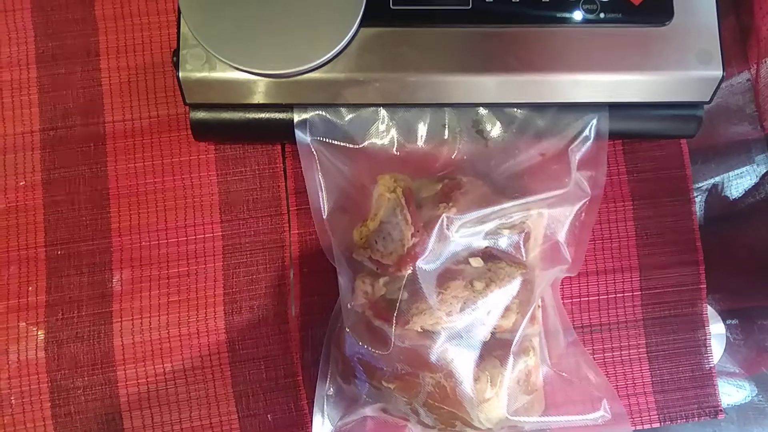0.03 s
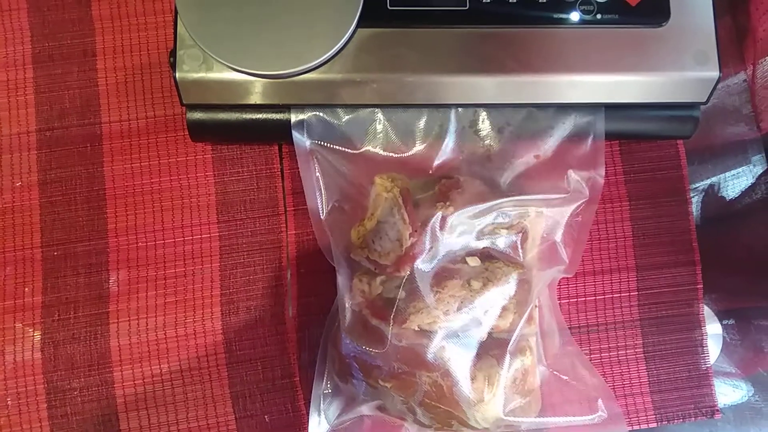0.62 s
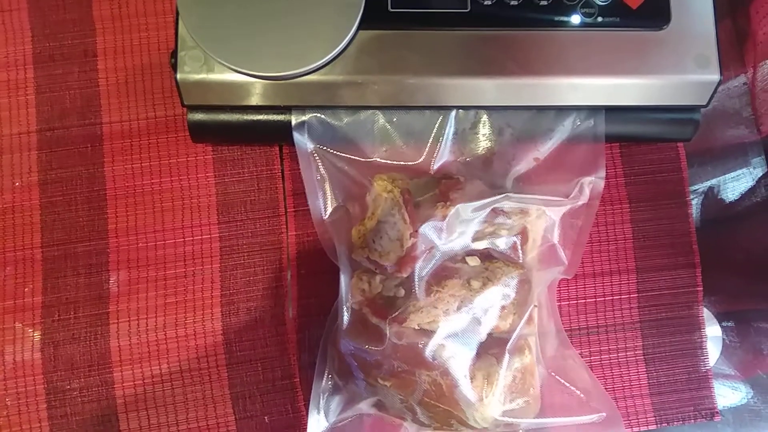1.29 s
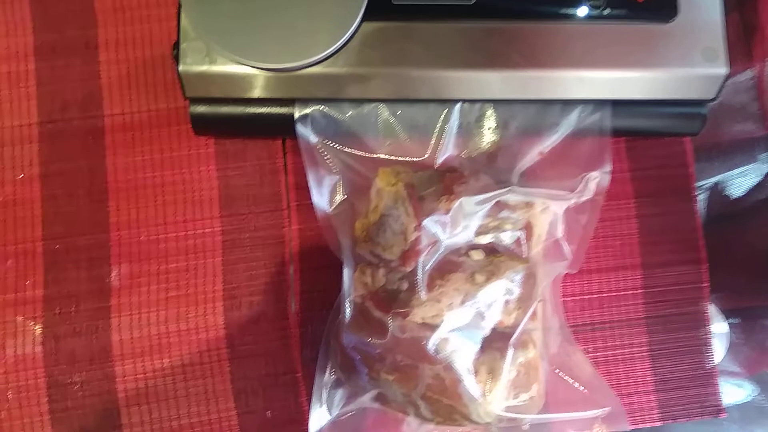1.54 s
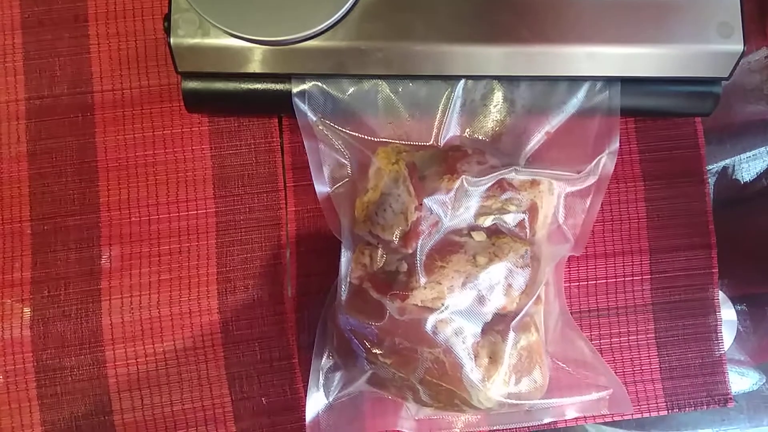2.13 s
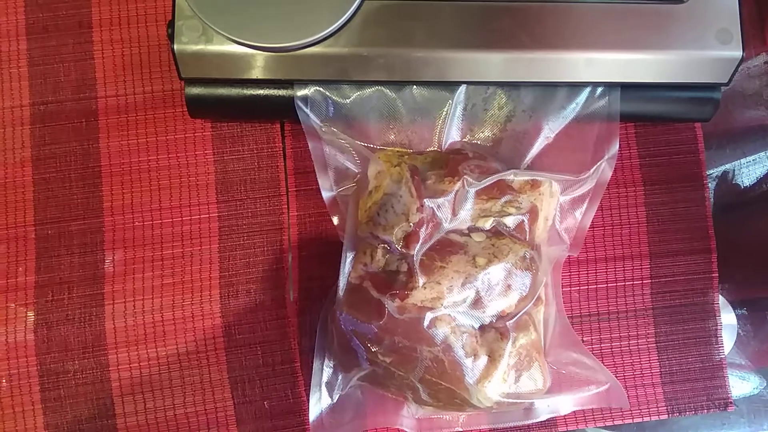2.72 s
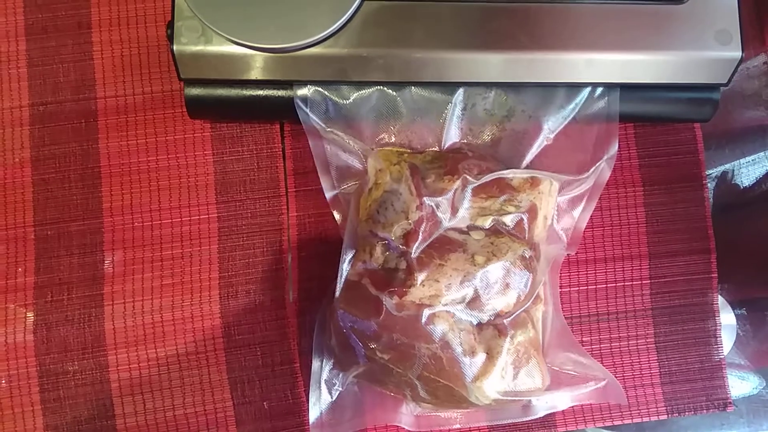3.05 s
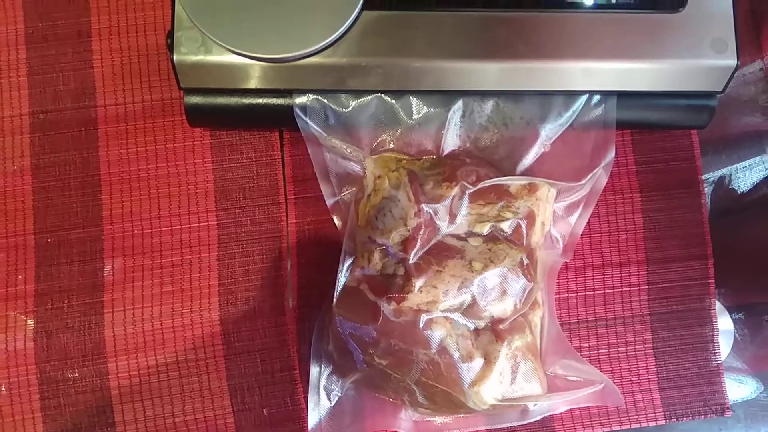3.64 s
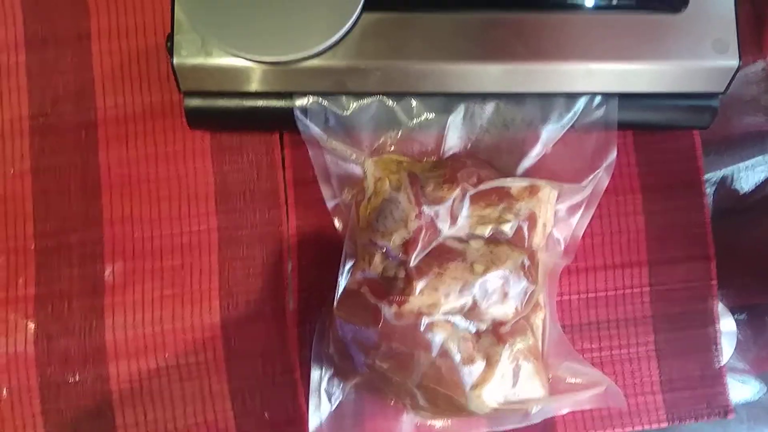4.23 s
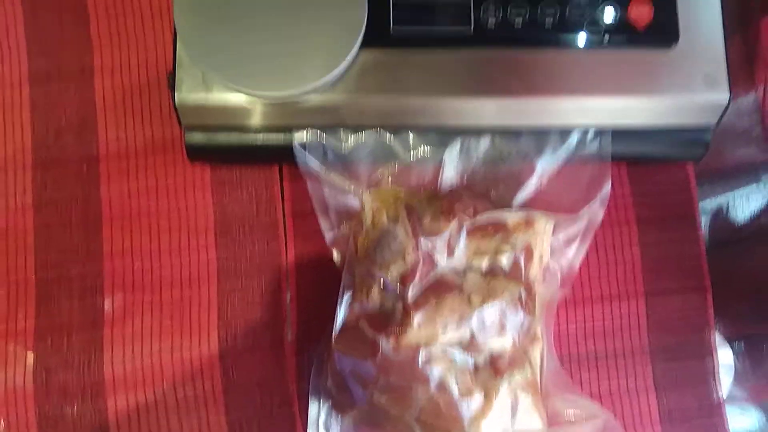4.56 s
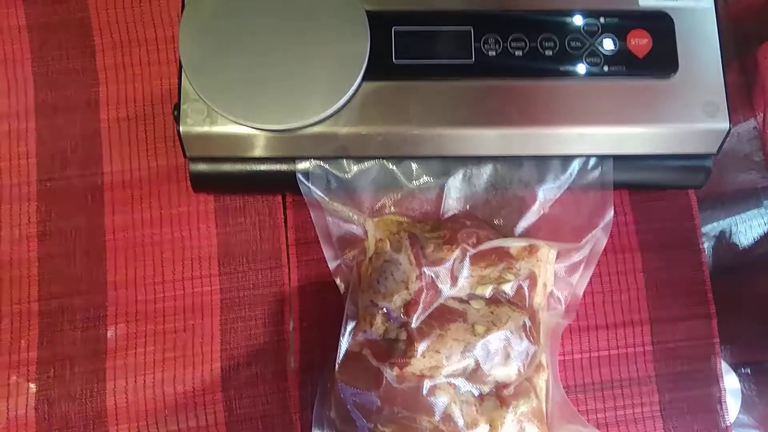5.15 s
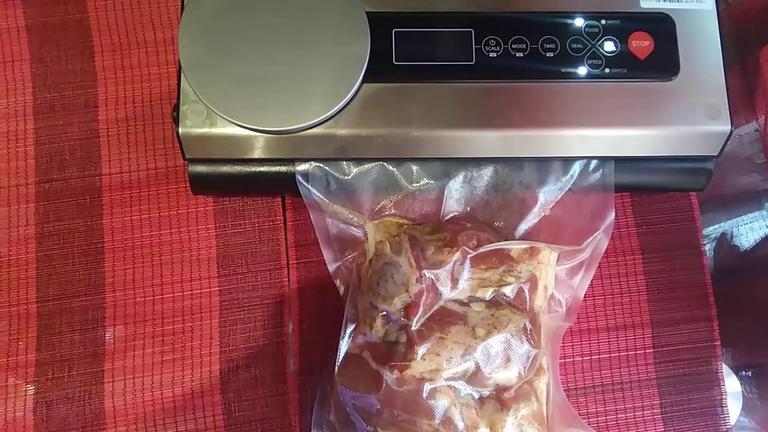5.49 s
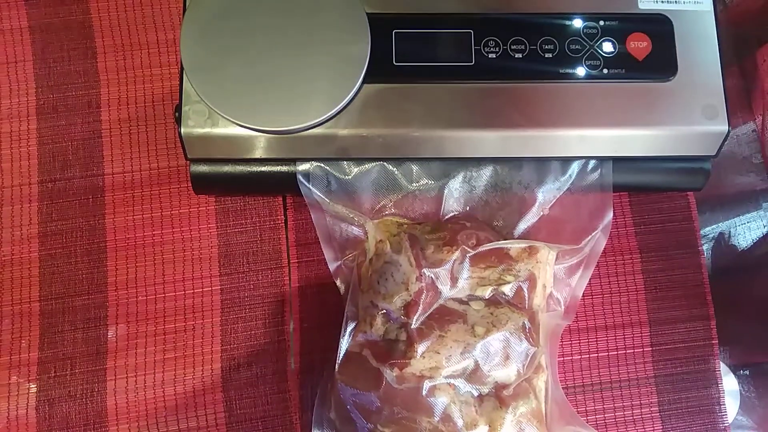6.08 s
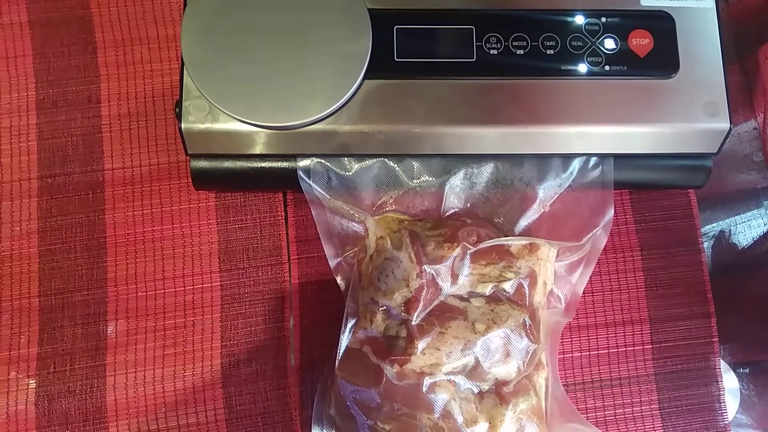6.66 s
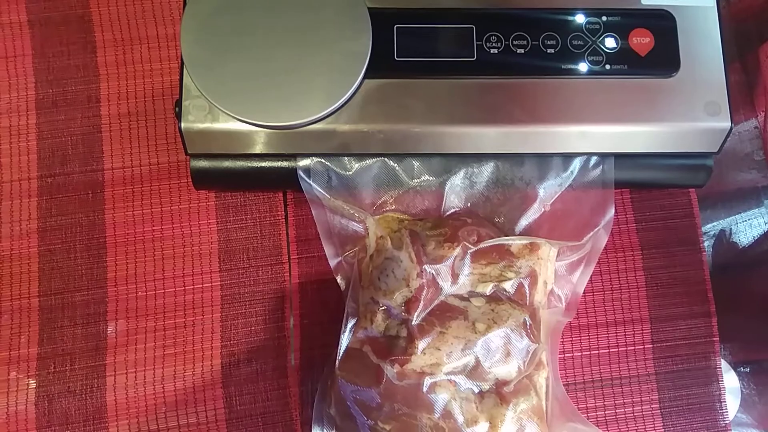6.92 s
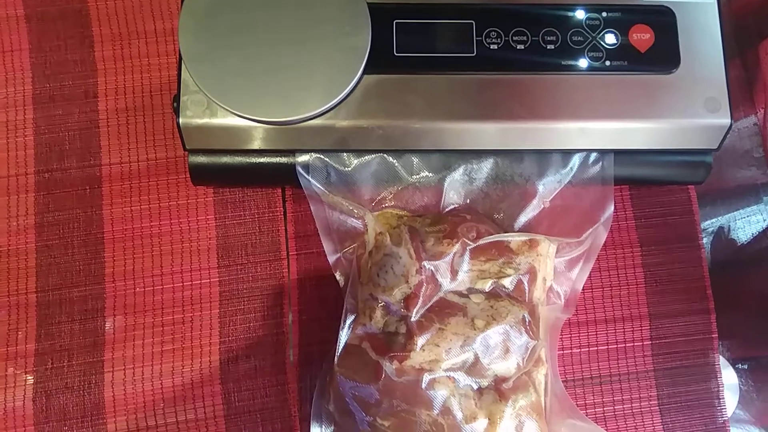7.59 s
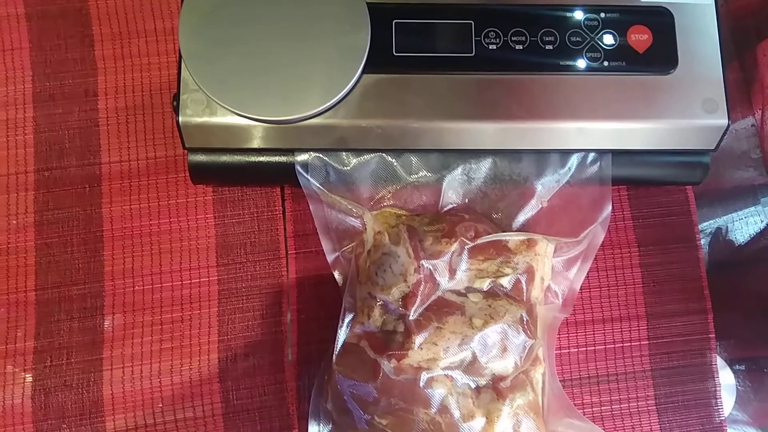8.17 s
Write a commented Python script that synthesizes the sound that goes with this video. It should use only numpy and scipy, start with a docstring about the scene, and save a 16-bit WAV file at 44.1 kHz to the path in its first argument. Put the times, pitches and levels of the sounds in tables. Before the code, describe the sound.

A vacuum sealer pump hums as a plastic bag crackles and air hisses, then speeds up into a harder buzz.

```python
"""In a kitchen, close up, a countertop vacuum sealer draws the air out of a plastic bag.
Its piston pump hums, slaps its valves and puffs air once a turn; the film crackles as it collapses.
As the bag pulls tight the motor sags, the valves clatter and the last air fizzes through the film.
Then the pump races in the thinning air and settles into a harder buzz against the vacuum."""
import sys
import numpy as np
from scipy import signal
from scipy.fft import rfft, irfft
from scipy.io import wavfile

SR = 44100
rng = np.random.default_rng(int(sys.argv[2]) if len(sys.argv) > 2 else 0)


def transcribe(u):
    """Save the signal u as a 16-bit wav file named by the first command-line argument.

    u: samples, shape (n,) or (channels, n), limited to [-1, 1]; the rate is SR.
    q: integer samples, one column per channel.
    """
    v = np.clip(np.atleast_2d(u).T, -1, 1)
    q = np.round(v * 32767).astype(np.int16)
    wavfile.write(sys.argv[1], SR, q)


N = 370440
TIME = np.arange(N) / SR

# where escaping air sits in the stereo image: (frequency [Hz], left minus right [dB])
AIR_BALANCE = [(2500, -20.5), (5000, 6), (7000, 25), (8200, 8.5), (9500, 2.5), (11500, -1.5), (14500, 4),
               (15600, -45.5)]


def amp(db):
    """Decibels to gain."""
    return 10 ** (np.asarray(db) / 20)


def unit(x):
    """Scales to rms 1."""
    return x / np.sqrt(np.mean(x ** 2) + 1e-20)


def follow(curve):
    """A (time, value) curve at every sample."""
    return np.interp(TIME, *np.transpose(curve))


def read(points, hz):
    """A (frequency, value) curve, interpolated on a log-frequency axis."""
    f, value = np.transpose(points)
    return np.interp(np.log(hz + 1), np.log(f + 1), value)


def pan(db):
    """Left and right gains for a level difference."""
    return amp(np.array([[.5], [-.5]]) * db)


def colour(x, eq, tilt=((1, 0), (SR, 0))):
    """Shapes a sound with an EQ and a left-right tilt, both (frequency [Hz], level [dB]), at rms 1."""
    hz = np.fft.rfftfreq(x.shape[-1], 1 / SR)
    return unit(irfft(rfft(x) * amp(read(eq, hz)) * pan(read(tilt, hz)), x.shape[-1]))


def pair(size, alike):
    """Stereo white noise, its channels correlated by `alike`."""
    a, b = rng.standard_normal((2, size))
    return np.array([a, alike * a + np.sqrt(1 - alike ** 2) * b])


def wander(hz):
    """Random drift up to about the given rate, at rms 1."""
    lowpass = np.exp(-(np.fft.rfftfreq(N, 1 / SR) / hz) ** 2)
    return unit(irfft(rfft(rng.standard_normal(N)) * lowpass, N))


def swell(peak_s, rise, fall, hold=0):
    """An envelope that climbs to 1, holds for some seconds and dies away; slopes in dB per s."""
    return amp(-np.maximum(np.maximum(rise * (peak_s - TIME), fall * (TIME - peak_s - hold)), 0))


def ring(eq, t60, alike, size=2048):
    """A dense cluster of short modes: a noise burst, flattened, delayed by size / 8 and given an EQ."""
    burst = rfft(pair(size, alike) * amp(-60 * np.arange(size) / SR / t60))
    flat = irfft(burst / (abs(burst) + 1e-9))
    return colour(np.roll(flat, size // 8, axis=1), eq)


def shaft():
    """Turns made so far: the motor sags as the bag closes, stumbles once, then races as the air thins."""
    # motor speed: (time [s], speed [turns/s])
    speed = [(0, 71.44), (1.8, 70.39), (2.7, 69.62), (2.98, 68.75), (3.25, 66.35), (3.42, 65.78),
             (3.6, 66.44), (3.8, 68.59), (4.04, 71.5), (4.23, 69.6), (4.35, 70.39), (4.77, 77.5),
             (4.98, 80.14), (5.15, 81.55), (5.35, 82.39), (5.7, 83.3), (6.3, 83.91), (8.4, 84.0)]
    return np.cumsum(follow(speed)) / SR + .0004 * wander(hz=25) + .0015 * wander(hz=3)


def load():
    """Vacuum, air flow and strain, each 0-1: strain peaks when the pump pulls hard yet still moves air."""
    # slight while the bag is slack, then building to the pump's limit: (time [s], vacuum [0-1])
    pull = [(0, 0.03), (2.6, 0.05), (3.05, 0.06), (3.3, 0.25), (3.7, 0.41), (4.0, 0.53), (4.35, 0.78),
            (4.65, 0.87), (5.0, 0.93), (5.3, 0.94), (5.6, 0.96), (6.2, 0.97)]
    vacuum = follow(pull)
    air_left = 1 - vacuum
    strain = (vacuum + 0.019) ** 0.838 * air_left ** 0.299
    return vacuum, air_left ** 0.71, strain / strain.max()


def hum(turns, vacuum):
    """The piston's two pushes a turn slide past each other with the vacuum; six orders swell and fade."""
    # piston tone at four loads: (shaft order, free [dB], bag closing [dB], nearly empty [dB], full [dB])
    orders = [(1, -41.5, -35, -23.5, -24), (2, -17, -45, -25.5, -28.5), (3, -44.5, -34.5, -47.5, -40.5),
              (4, -46, -21, -44, -42), (5, -39.5, -52, -37, -40.5), (6, -47, -34.5, -41.5, -39)]
    stage_vacuums = [0, 0.33, 0.92, 1]
    skip_s, second_push = 2.793, 0.53
    polarity = np.clip((skip_s - TIME) / .002, -1, 1)  # a brief skip in the hum, like a splice
    lag_turns = 0.737 - 0.3225 * vacuum
    stroke = np.zeros(N)
    for k, (_, *stages_db) in enumerate(orders, 1):
        level = amp(np.interp(vacuum, stage_vacuums, stages_db))
        pushes = abs(1 + second_push * np.exp(-2j * np.pi * k * lag_turns))
        partial = np.cos(2 * np.pi * k * turns - np.pi * k * k / 6)
        stroke -= polarity ** (k % 2) * level * pushes * partial
    throb = 1 + 0.0093 * np.sin(2 * np.pi * turns / 5) + 0.0063 * wander(hz=24)
    return np.sqrt(2) * stroke * throb * pan(6.73) * amp(-1.5)


def knocks(turns, orders, gap_turns, second, smear_rad):
    """Two knocks a turn, smeared by the housing: a wavetable of the orders above the hum."""
    # stereo phase of the buzz: (frequency [Hz], left channel's lead [rad])
    lead = [(50, -9.5), (800, 0.46), (1100, 1.3), (1400, -1.33), (1600, -3), (2100, -2.5)]
    nominal_turns_per_s = 80
    k, left_db, right_db = np.transpose(orders)
    k = np.round(k).astype(int)
    phase = np.angle(1 + second * np.exp(-2j * np.pi * k * gap_turns))
    phase += smear_rad * rng.standard_normal(len(k))
    spectrum = np.zeros((2, 513), complex)
    spectrum[0, k] = amp(left_db) * np.exp(1j * phase)
    spectrum[1, k] = amp(right_db) * np.exp(1j * (phase - read(lead, k * nominal_turns_per_s)))
    cycle = irfft(spectrum, norm="forward") / 2
    grid = np.linspace(0, 1, cycle.shape[1], endpoint=False)
    tone = np.array([np.interp(turns, grid, side, period=1) for side in cycle])
    return tone * (1 + 0.024 * wander(hz=40))


def buzz(turns, strain, working, settled):
    """The housing's light buzz ducks under strain and crossfades to a hard one near full vacuum."""
    # buzz while air flows freely: (shaft order, left level [dB], right level [dB])
    free_orders = [(7, -39.5, -45), (9, -44.5, -56), (10, -51.5, -48.5), (11, -41.5, -45.5),
                   (12, -41, -44.5), (13, -43.5, -51), (14, -49, -53.0), (16, -50, -84), (17, -46, -87),
                   (18, -46, -65), (19, -61, -51), (20, -38, -55), (21, -45.5, -48), (22, -39.5, -53),
                   (23, -41.5, -74), (24, -46.5, -53), (25, -51.5, -65), (28, -53, -49.5), (29, -62, -56.5)]
    # buzz under vacuum: (shaft order, left level [dB], right level [dB])
    tight_orders = [(7, -37.5, -51.5), (8, -35.0, -35.5), (9, -25.5, -29.5), (10, -30, -35.0),
                    (11, -46.5, -44.5), (12, -34, -75), (13, -39, -44), (14, -34, -48.5), (15, -48, -52),
                    (16, -50, -52.5), (17, -36, -76), (18, -31, -34), (19, -38, -74), (20, -55.5, -45),
                    (21, -44.5, -40.0), (22, -70, -37.5), (23, -37, -46.5), (24, -41, -46),
                    (25, -49.5, -45), (26, -46.5, -53), (27, -67, -61.5), (28, -64, -61), (29, -57, -54),
                    (30, -60, -60), (31, -64.5, -73), (32, -83, -73.5), (33, -63, -90), (36, -65.5, -53),
                    (41, -54, -87), (42, -63, -63), (43, -60, -59), (44, -59.5, -65), (45, -48.5, -47.5),
                    (46, -78, -56), (47, -54, -88), (49, -77, -74), (51, -57, -62)]
    light = knocks(turns, free_orders, gap_turns=0.45, second=0.45, smear_rad=0.76)
    hard = knocks(turns, tight_orders, gap_turns=0.205, second=0.51, smear_rad=0.54)
    return amp(-0.5) * (light * working * amp(-6.5 * strain) + hard * settled)


def valves(turns, vacuum, strain):
    """Inlet and outlet valves slap once a turn each; load shifts their timing, so overtones come and go."""
    # the housing's low answer to a slap: (frequency [Hz], level [dB])
    groan_eq = [(250, -46), (400, 1), (500, 9), (620, -0.5), (750, 10), (900, 10), (1020, 3), (1150, -4),
                (1400, -27)]
    # its midrange answer: (frequency [Hz], level [dB])
    rasp_eq = [(900, -41), (1100, -13), (1250, 6.5), (1400, 7.5), (1700, 4), (1950, 6), (2150, -5.5),
               (2400, -20), (3000, -17), (3700, -11.5), (4600, -39)]
    # its high answer: (frequency [Hz], level [dB])
    tick_eq = [(1900, -40), (2300, 8.5), (3100, -9.5), (3600, -8.5), (4200, 0.5), (5000, -4.5), (5800, 6),
               (6500, -7.5), (8000, 2.5), (9500, -6), (11200, -9), (12500, -30), (14000, -26), (14600, -34)]
    # a rebounding valve's thin squeal under a hard pull: (frequency [Hz], level [dB])
    squeal_eq = [(1900, -17), (2350, 10), (2700, -17), (3100, -20.5), (3700, 5.5), (4150, -1), (4700, -9),
                 (5800, -7), (6800, -5), (7800, -1), (10000, -18)]

    def slap(lag_turns):
        offset = (turns - lag_turns + .5) % 1 - .5
        return np.sinc(380 * offset) * (1 + .04 * wander(hz=40))

    def strike(blows, eq, t60, alike):
        return unit(signal.oaconvolve(blows[None], ring(eq, t60, alike), axes=1)[:, :N])

    slaps = slap(0) + 0.82 * slap(0.46 - strain * (0.196 + 0.022 * wander(hz=5.7)))
    bounce = slap(0) + 0.43 * slap(0.17 - 0.0856 * vacuum)  # the rebound comes sooner as vacuum builds
    groan = strike(slaps, groan_eq, t60=0.074, alike=0.86) * amp(-34.5) * strain ** 1.33
    rasp = strike(slaps, rasp_eq, t60=0.042, alike=0.014) * amp(-36.5) * strain ** 0.99
    tick = strike(slaps, tick_eq, t60=0.032, alike=0.02) * amp(-53) * (vacuum + 0.015) ** 0.11
    squeal = strike(bounce, squeal_eq, t60=0.0093, alike=0.077) * amp(-49.5)
    squeal *= strain ** 1.03 * vacuum ** 0.52
    return groan * pan(5.7) + (rasp + squeal) * pan(3) + tick * pan(9.2)


def tone_swells(x, size=2048):
    """Timed EQ swells and dips in the pump's tone, some gliding in frequency."""
    # EQ bells: (time [s], half length [s], centre [Hz], glide [Hz/s], gain [dB])
    bells = [(0, 1, 282, -2, -6), (1.597, 0.6, 875, 0, -4), (2.7, 0.88, 2020, 0, 6.5),
             (2.88, 0.26, 1000, 3, 10.5), (3.05, 0.27, 208, 4, 8.5), (3.49, 0.14, 730, 0, 6.5),
             (3.547, 0.25, 1530, 597, 2.5), (3.523, 0.54, 506, 6, 10.5), (3.7, 0.27, 1160, 391, 5),
             (3.7, 0.22, 1910, 902, 5), (3.75, 0.16, 201, -4, 6), (3.752, 0.11, 280, 0, -7),
             (3.9, 0.15, 874, 400, 7.5), (4.155, 0.29, 535, -7, -8.5), (4.39, 0.046, 1860, 0, 11),
             (4.421, 0.13, 1360, 0, 4), (4.468, 0.058, 705, -4, 16.5), (4.512, 0.04, 510, 0, 6.5),
             (4.606, 0.16, 315, -2, -23), (4.572, 0.22, 1640, -1300, 3), (4.65, 0.15, 613, 1.5, 7),
             (4.672, 0.093, 740, -4, 8), (4.77, 0.068, 1270, 0, 7), (4.836, 0.11, 860, 0, 8),
             (4.853, 0.17, 4030, 900, 6), (4.952, 0.23, 2250, 600, 6), (4.996, 0.18, 393, 0, 2.5),
             (5.15, 0.4, 1980, 397, 6.5), (5.2, 0.25, 5800, 0, 4), (5.243, 0.098, 3630, 0, 4)]
    half_width, overlap = 0.11, size * 3 // 4  # width as a share of the centre frequency
    hz, t, spectra = signal.stft(x, SR, nperseg=size, noverlap=overlap)
    eq_db = np.zeros(spectra.shape[1:])
    for s, span, centre, glide, db in bells:
        near = abs(t - s) < 3 * span
        since = t[near] - s
        detune = (hz[:, None] - centre - glide * since) / (centre * half_width)
        eq_db[:, near] += db * np.exp(-detune ** 2 - (since / span) ** 2)
    return signal.istft(spectra * amp(eq_db), SR, nperseg=size, noverlap=overlap)[1][:, :N]


def motor_rush(turns, flow, strain):
    """Soft motor noise inside the housing, pulsing once a turn and fuller under load."""
    # the motor running free: (frequency [Hz], level [dB])
    free_eq = [(20, -33), (70, -3), (150, 6), (300, 0), (450, 3), (570, -12), (800, 1), (1100, -25),
               (1500, 2.5), (1950, -9), (2300, -13), (3500, -26), (6000, -41)]
    # the motor under load: (frequency [Hz], level [dB])
    loaded_eq = [(20, -20), (42, -22), (70, -4), (150, 4.5), (280, -2.5), (400, -3), (560, -8), (780, -1.5),
                 (1100, -8), (1500, -6), (1950, -5.5), (2300, -18), (3500, -14.5), (6000, -25)]
    free = colour(pair(N, 0.2), free_eq) * amp(-52) * flow
    loaded = colour(pair(N, 0.11), loaded_eq) * amp(-46) * strain ** 0.42
    return (free + loaded) * (1 + 0.17 * np.cos(2 * np.pi * turns)) * pan(7.4)


def flutter(flow):
    """A low flutter, stronger while air flows, that swells as the film is drawn shut."""
    bed_eq = [(12, -6), (40, 3), (70, -7), (110, -8), (160, -12), (400, -54), (2000, -107)]
    flap_eq = [(20, -16), (50, -5), (90, 9), (160, -18), (400, -46), (2000, -107)]
    bed = colour(pair(N, .98), bed_eq) * np.hypot(amp(-52.5) * flow, amp(-50.5))
    flap = colour(pair(N, .98), flap_eq) * amp(-42) * swell(3.2, rise=46, fall=13)
    return (bed + flap) * pan(7)


def exhaust(puff, flow):
    """Bright puffs of pumped air thin to a faint leak as the bag empties."""
    # exhaust hiss: (frequency [Hz], level [dB])
    hiss_eq = [(1500, 6.5), (2600, -0.5), (4000, 1), (5000, 1.5), (5800, 6.5), (7000, -1.5), (7800, 8.5),
               (9900, 17.5), (10600, 13.5), (11600, 21), (12200, 7.5), (13500, 14), (14800, -16),
               (15600, -10.5)]
    slack_db, leak_db = -40, -55.5
    hiss = colour(pair(N, 0.011), hiss_eq, AIR_BALANCE)
    return unit(hiss * puff) * np.hypot(amp(slack_db) * flow, amp(leak_db))


def crackles(size=2048):
    """Each crease flips with a sharp snap and rings the film for a few cycles."""
    # flipping creases: (time [s], level [dB], ring pitch [Hz], ring t60 [s], snap against ring [dB])
    creases = [(.523, -23, 2110, 0.0045, 6), (.556, -26, 2480, 0.004, 0), (0.596, -14.5, 860, 0.017, -40),
               (0.6034, -8.5, 1900, 0.0055, -5), (0.6043, -11.5, 990, 0.01, -10),
               (1.127, -27, 2760, 0.0051, 8), (1.192, -6, 1760, 0.0035, -5), (1.194, -27, 1400, 0.005, 2),
               (1.808, -32, 2000, 0.005, 11), (2.0722, -16.5, 2780, 0.004, -0.5),
               (2.073, -22, 900, .01, -5)]
    # the snap's attack: (frequency [Hz], level [dB])
    snap_eq = [(400, 0), (1100, 2.5), (2000, 10.5), (3500, -4), (5300, -7), (7600, 7.5), (9200, -1),
               (14000, -5)]
    out, t = np.zeros((2, N)), np.arange(size) / SR
    for s, db, hz, t60, snap_db in creases:
        modes = .75 * np.sin(2 * np.pi * hz * t) + .25 * np.sin(2 * np.pi * hz * 1.19 * t)
        film = modes * amp(-60 * t / t60) * (1 - np.exp(-t / .00016))
        snap = np.roll(ring(snap_eq, t60=.006, alike=.5), -(size // 8), axis=1) * np.exp(-t / .01)
        snap *= amp(snap_db) / abs(snap).max()
        out[:, round(s * SR):][:, :size] -= amp(db) * (film + snap) * pan(4.5)
    return out


def kitchen(x, t60, size=16384):
    """A short diffuse tail from the worktop and walls."""
    t, predelay_s = np.arange(size) / SR, .003
    wash = colour(pair(size, 1.0), [(300, -36), (2000, -6), (8000, -11), (15000, -62)])
    tail = wash * amp(-60 * t / t60) * (t > predelay_s)
    return signal.oaconvolve(x, tail / np.linalg.norm(tail[0]), axes=1)[:, :N]


def rattle(turns):
    """The valves chatter once a turn in two bouts while the bag pulls tight."""
    # valve chatter: (frequency [Hz], level [dB])
    chatter_eq = [(200, -15), (700, -9), (1400, 4), (2100, 4.5), (3000, 0), (6000, -13), (10000, -36)]
    # crests of the chatter: (time [s], level [dB])
    bouts = [(3.33, -45), (4.45, -54)]
    chatter = colour(pair(N, 0.3), chatter_eq)
    chatter *= amp(1.4 * np.cos(2 * np.pi * turns) + 4.8 * wander(hz=200))
    envelope = sum(amp(db) * swell(s, rise=71, fall=28) for s, db in bouts)
    return unit(chatter) * envelope * pan(6)


def sizzle(puff):
    """The last air squeezes through the closing film in a brief, high, pulsing sizzle."""
    hiss_eq = [(6000, -33), (8300, -4), (9300, 7), (10500, 1), (11500, -3), (14000, -22)]
    hiss = colour(pair(N, 0.19), hiss_eq)
    return unit(hiss * puff ** 2) * amp(-39.5) * swell(3.34, rise=130, fall=120, hold=0.055)


def fizz(strain):
    """Air seeps along the film, surging with tiny pops of air and juice as the bag closes."""
    # broad fizz and its pops: (frequency [Hz], level [dB])
    fizz_eq = [(1000, 13), (2500, 11.5), (4500, 3.5), (6500, 8.5), (11000, 10), (13500, 8), (15500, -21)]
    surge_s, hold_s, pops_per_s = 3.46, 0.1, 130
    hiss = colour(pair(N, 0.09), fizz_eq, AIR_BALANCE)
    pops = (rng.random(N) < pops_per_s / SR) * amp(2 * np.minimum(rng.exponential(1, N), 4))
    spits = colour(pair(N, 0.37) * pops, fizz_eq) * swell(surge_s, rise=180, fall=33, hold=hold_s)
    grainy = unit(hiss * amp(3.5 * wander(hz=390)))
    surge = swell(surge_s, rise=120, fall=88, hold=hold_s)
    return grainy * np.hypot(amp(-41) * surge, amp(-55) * strain) + amp(-49) * spits


def scene():
    """Mixes pump, air and bag; only the crackles get room reverb."""
    turns = shaft()
    vacuum, flow, strain = load()
    settled = (vacuum / vacuum[-1]) ** 15.8  # opens only near the pump's limit
    working = np.sqrt(1 - settled ** 2)  # the other side of an equal-power crossfade
    buzzing = buzz(turns, strain, working, settled)
    film = crackles()
    pump = tone_swells(hum(turns, vacuum) + buzzing + valves(turns, vacuum, strain * working ** .6))
    pump += rattle(turns) + motor_rush(turns, flow, strain) + flutter(flow)
    puff = amp(2.56 * np.cos(2 * np.pi * turns) + 1.4 * wander(hz=117))  # one ragged pulse a turn
    air = exhaust(puff, flow) + sizzle(puff) + fizz(strain)
    return pump + air + film + amp(-14) * kitchen(film, t60=0.17)


def record(dry):
    """A steep low-pass trims the very top of the treble."""
    cutoff_hz = 15850
    lowpass = signal.firwin(511, cutoff_hz, window=("kaiser", 9), fs=SR)
    return signal.oaconvolve(dry, lowpass[None], "same")


dry = scene()
out = record(dry)
transcribe(out)
```